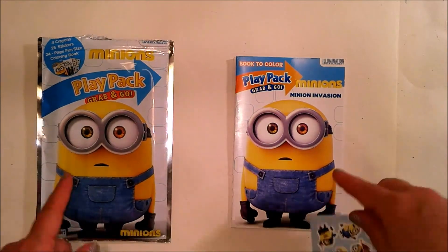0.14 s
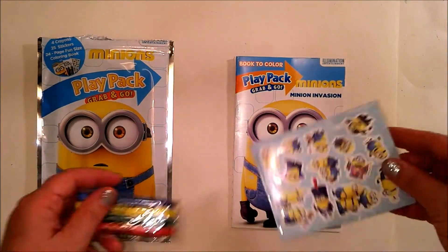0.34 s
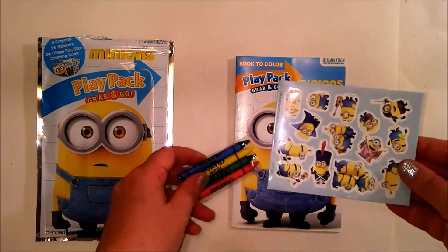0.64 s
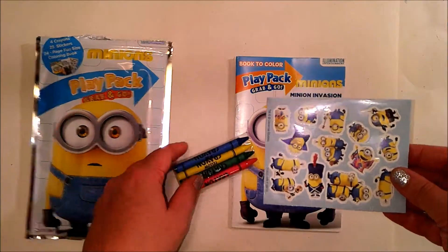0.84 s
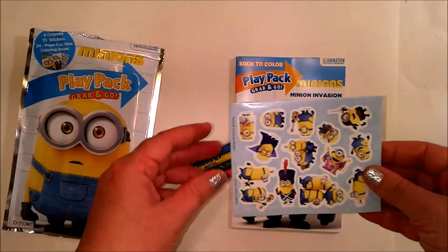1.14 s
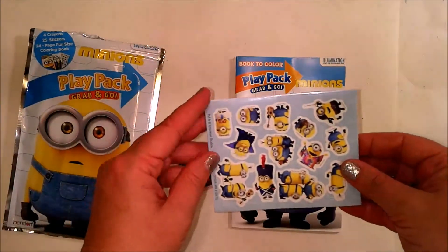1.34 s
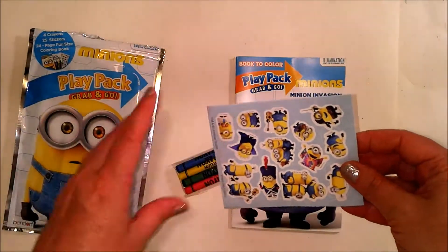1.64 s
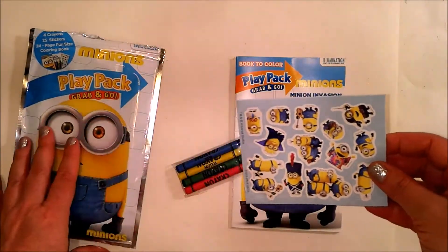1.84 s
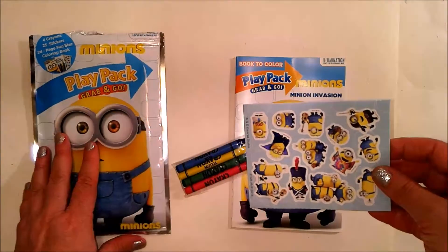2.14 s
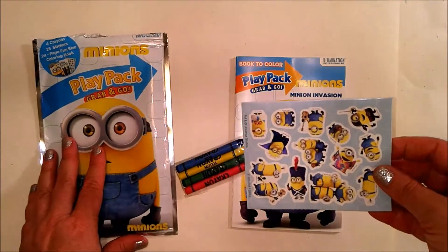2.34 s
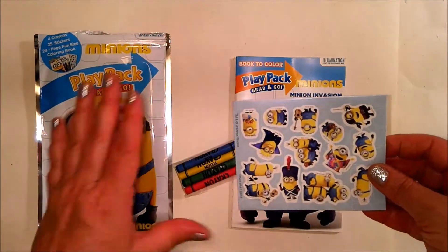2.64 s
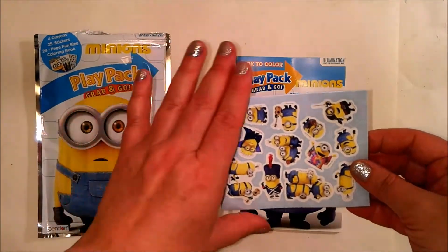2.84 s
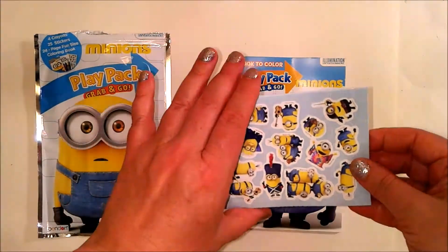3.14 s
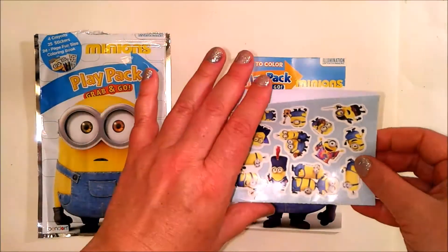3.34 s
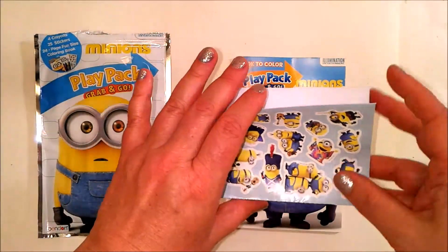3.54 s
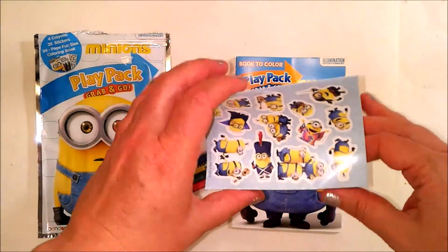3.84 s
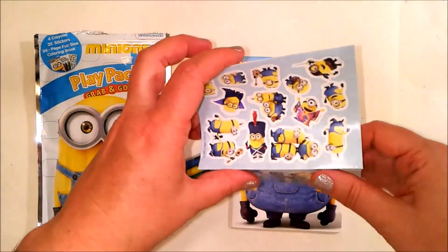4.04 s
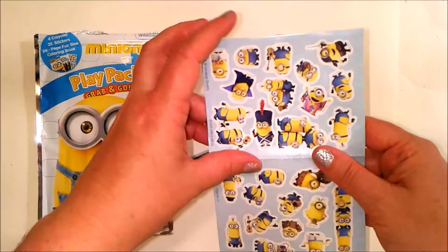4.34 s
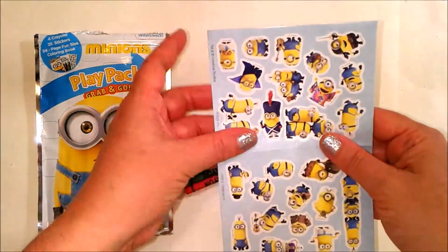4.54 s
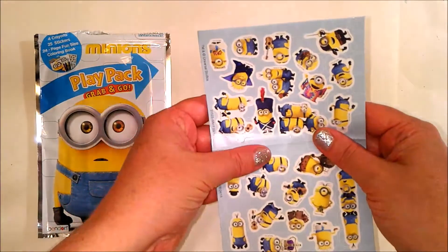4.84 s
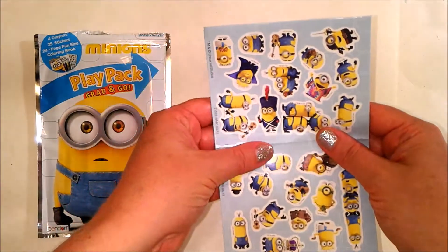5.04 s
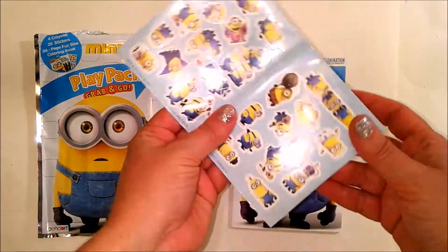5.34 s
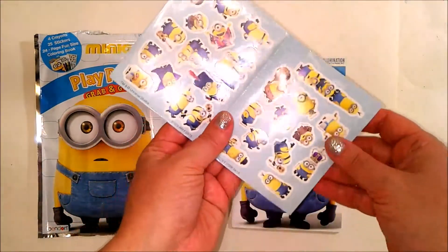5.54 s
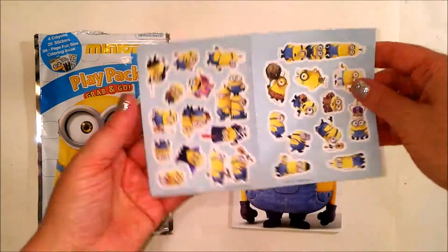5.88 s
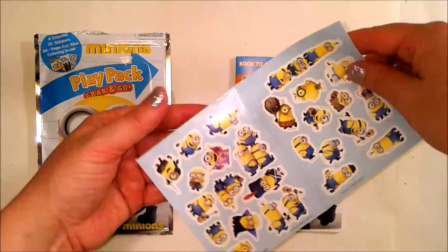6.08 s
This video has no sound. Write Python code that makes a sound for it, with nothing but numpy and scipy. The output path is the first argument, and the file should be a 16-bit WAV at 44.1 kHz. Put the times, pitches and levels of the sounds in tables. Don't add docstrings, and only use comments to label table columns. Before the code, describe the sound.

Thin paper snaps and scrapes under fingers, followed by a dull wooden knock and hard little crayon ticks. Isolated nail and table taps come next, with soft brushing between. Later the sheet slides, opens with a muted knock, crackles in a quick cluster and swishes brightly. A close microphone catches it dry, with short room reverberation, steady hiss, low rumble and a faint distant fan.

```python
import sys
import numpy as np
from scipy import signal
from scipy.fft import rfft, irfft, next_fast_len
from scipy.io import wavfile
from scipy.ndimage import uniform_filter1d

SR = 44100
rng = np.random.default_rng(int(sys.argv[2]) if len(sys.argv) > 2 else 0)


def persist_wave(psi):
    counts = np.round(np.clip(psi, -1, 1) * 32767).astype(np.int16)
    wavfile.write(sys.argv[1], SR, np.atleast_2d(counts).T)


def how_loud(loudness_db):
    steps = np.asarray(loudness_db, float) / 20
    return 10 ** steps


N = 273816


def level(x, db):
    return x * how_loud(db) / np.sqrt(np.mean(x ** 2))


def band(x, hz, width):
    return signal.lfilter(*signal.iirpeak(hz, hz / width, fs=SR), x)


def body(x, modes):
    return sum(how_loud(db) * band(band(x, hz, width), hz, width) for hz, width, db in modes)


def treble(x):
    high_pass = signal.butter(3, 7300, "high", fs=SR, output="sos")
    return signal.sosfilt(high_pass, band(x, 7800, 9100))


def fade(t60, size):
    return np.exp(-np.log(1000) * np.arange(size) / SR / t60)


def add(out, s, sound):
    i = int(s * SR)
    out[i:i + len(sound)] += sound[:N - i]


def glide(breakpoints):
    return np.interp(np.arange(N) / SR, *np.transpose(breakpoints))


def walk(rate):
    k = int(SR / rate)
    steps = np.repeat(rng.standard_normal(N // k + 1), k)
    return 0.62 * uniform_filter1d(uniform_filter1d(steps, k), k)[:N]


def grit(rate, spread_db):
    slips = rng.random(N) < rate / SR
    return slips * rng.standard_normal(N) * how_loud(spread_db * rng.exponential(size=N))


# time in seconds, load in dB.
LEAN = [(0.0, 0), (0.41, -6.5), (0.75, 3), (0.9, 15), (1.06, 11.5), (1.33, 1), (1.68, 0), (1.8, 4),
        (2.0, -8.5), (2.4, 5.5), (2.8, -4), (3.2, 0), (4.86, -2.5), (5.62, 4.5), (6.09, 3), (6.21, 7)]


def rumble():
    lean_db = glide(LEAN)
    low = body(rng.standard_normal(N), [(42.5, 23, -0.5), (58.4, 13.5, -4.5)])
    low = signal.sosfilt(signal.butter(4, [35, 74], "band", fs=SR, output="sos"), low)
    drone = body(rng.standard_normal(N), [(131.3, 68, 3.5), (182.0, 73, -5.5)])
    low_db = -64 + 0.43 * lean_db
    drone_db = -74.5 + lean_db
    return level(low, 2.9) * how_loud(low_db) + level(drone, -0.16) * how_loud(drone_db)


# frequency in Hz, density in dB per Hz.
AIR = [(50, -17), (90, -2), (300, -8.5), (1500, -11), (5300, -19), (6600, -23), (11000, -14.5),
       (16000, -10.5)]


def hiss():
    hz, db = np.transpose(AIR)
    size = next_fast_len(N)
    colour = how_loud(np.interp(np.log(np.fft.rfftfreq(size, 1 / SR) + 1), np.log(hz), db))
    return level(irfft(rfft(rng.standard_normal(size)) * colour, size)[:N], -61.5)


# centre in Hz, width in Hz, level in dB.
WHINE = [(800, 20, -80), (1674, 9.1, -90.5), (2684, 41, -82), (4800, 250, -73)]


def whine():
    out = np.zeros(N)
    for hz, width, db in WHINE:
        tone = body(rng.standard_normal(N), [(hz, width, 0)])
        out += level(tone * how_loud(2 * walk(12)), db)
    return out


# centre in Hz, width in Hz, level in dB.
PAPER = [(2655, 920, -2), (4010, 2600, -3), (5430, 1760, 1.5), (7100, 430, -18)]
# centre in Hz, width in Hz, level in dB.
DULL = [(900, 960, -3), (1570, 890, -2)]
FLECK_RANGE = (1422, 6400)
# time in seconds, level in dB.
FLEX = [(0.0, -66.5), (0.26, -77), (0.55, -71), (0.78, -66), (0.92, -75), (1.5, -79), (3.35, -79.5),
        (3.75, -68.5), (3.98, -76), (4.13, -67.5), (4.41, -64.5), (4.79, -76.5), (5.27, -77), (5.57, -61.5),
        (5.88, -71), (6.09, -73), (6.21, -55.5)]
# start in seconds, length in seconds, rub in dB, dull part in dB.
SCUFFS = [(0, 0.13, -75, 9), (0.413, 0.048, -53.5, -16), (0.699, 0.1, -64.5, 1),
          (0.8165, 0.046, -56.5, -17), (0.903, 0.071, -56.5, -1), (2.32, .035, -60.5, -4),
          (2.372, 0.064, -63.5, -2), (3.867, 0.13, -64, -4.5), (4.097, 0.16, -59.5, -2.5),
          (4.246, 0.11, -59.5, 0), (5.857, 0.061, -54.5, -5.5), (5.92, 0.086, -59.5, -6.5),
          (6.027, 0.11, -61.5, -5)]
# start in seconds, length in seconds, rub in dB, dull part in dB.
SWEEPS = [(0.279, 0.02, -69, 7.5), (0.848, 0.048, -51.5, -2), (1.85, 0.1, -60, -6),
          (1.925, 0.34, -60.5, -32), (3.146, 0.049, -64, -8), (3.233, 0.026, -63.5, -17),
          (3.36, 0.3, -65, -2.5), (3.743, 0.14, -57, -3.5), (3.988, 0.12, -58.5, -7.5),
          (4.343, 0.26, -68, -6), (4.57, 0.058, -57.5, -11), (4.689, 0.082, -66.5, -0.5),
          (4.787, 0.055, -64, -3), (5.141, 0.11, -61.5, -0.5), (5.37, 0.4, -70.5, 8.5),
          (5.538, 0.15, -63, -9), (5.684, 0.11, -69, -2), (5.768, 0.087, -57, -6),
          (6.143, 0.082, -59.5, -2.5)]
# start in seconds, end in seconds.
RAISED = [
    (4.2, 4.5),
    (5.1, 6.3),
]
SCUFF_RISE, SWEEP_RISE = 0.05, 0.34
TOP_DB, RAISED_TOP_DB = -6, -2.5


def rustle():
    sheet = level(sum(body(grit(7000, 0.84) * how_loud(6.4 * walk(40)), [mode]) for mode in PAPER), 0)
    flecks = np.zeros(N)
    for hz in rng.uniform(*FLECK_RANGE, size=12):
        flecks += band(rng.standard_normal(N), hz, 170) * how_loud(23 * walk(35))
    sheet = level(sheet + level(flecks, -10), 0)
    top = level(treble(grit(10000, 0.78) * how_loud(1.7 * walk(40))), -0.66)
    dull = level(body(grit(4000, 0.86) * how_loud(0.88 * walk(30)), DULL), -2.9)
    bend = body(rng.standard_normal(N), [(331, 167, 0)])
    out = level(bend, -1.4) * how_loud(glide(FLEX))
    strokes = [(*row, SCUFF_RISE) for row in SCUFFS] + [(*row, SWEEP_RISE) for row in SWEEPS]
    for s, length, db, dull_db, rise in strokes:
        raised = any(start < s < end for start, end in RAISED)
        top_db = RAISED_TOP_DB if raised else TOP_DB
        span = slice(int(s * SR), min(int((s + length) * SR), N))
        progress = np.linspace(0, 1, span.stop - span.start)
        swell = np.sqrt(np.interp(progress, [0, rise, 1], [0, 1, 0]))
        rub = sheet[span] + how_loud(top_db) * top[span] + how_loud(dull_db) * dull[span]
        add(out, s, how_loud(db) * swell * rub)
    return out


def ticks(table, snap_db, crackle_db, t60):
    out, size = np.zeros(N), 4096
    for (s, db, hz, high_db), noise in zip(table, rng.standard_normal((len(table), 4, size))):
        ring = body(noise[0] * fade(t60, size), [(hz, 0.91 * hz, 0)])
        high = body(noise[1] * fade(0.7 * t60, size), [(5520, 1070, 0)])
        snap = treble(noise[2] * fade(0.9 * t60, size))
        crackle = (body(noise[3], PAPER) + band(noise[3], hz, hz / 2) / 2) * fade(0.054, size)
        dry_db = 1.49 * (db + 49.5)
        parts = [(0, ring), (high_db, high), (snap_db - dry_db, snap), (crackle_db - 0.21 * dry_db, crackle)]
        tick = sum(how_loud(part_db) * part / np.abs(part).max() for part_db, part in parts)
        add(out, s, how_loud(db + 2.0) * tick)
    return out


# start in seconds, peak in dB, ring in Hz, high ring in dB.
CREASES = [(0.0551, -49.5, 2670, 1), (0.2864, -58, 2180, -6), (0.4186, -43.5, 2460, 14.5),
           (0.527, -66, 5500, -4), (0.6992, -39, 2080, -20), (0.7514, -57, 1540, -8),
           (3.2082, -59, 1710, -12), (3.2427, -68, 2610, 10), (3.3645, -56.5, 1720, 1),
           (3.6531, -52.5, 1690, -20), (4.2921, -51, 2530, -19), (5.3784, -48, 1740, -1),
           (5.4262, -46.5, 1760, -3.5), (5.4673, -52, 1590, -5), (5.51, -49, 1980, -3),
           (5.8583, -62, 1810, 14)]


def creases():
    return ticks(CREASES, snap_db=-11, crackle_db=-8.5, t60=0.007)


def modes(table):
    out, t = np.zeros(N), np.arange(20000) / SR
    for s, db, hz, t60 in table:
        build_up = 1 - np.exp(-hz * t / 0.28)
        add(out, s, how_loud(db) * np.sin(2 * np.pi * hz * t) * build_up * fade(t60, len(t)))
    return out


# start in seconds, peak in dB, frequency in Hz, t60 in seconds.
RINGS = [(.9125, -27, 1180, 0.023), (.4135, -43, 5200, 0.0073), (.419, -44.5, 5690, 0.12),
         (.419, -47, 5910, .1), (.419, -46, 6140, 0.14), (2.3905, -48, 4700, .008),
         (.418, -48, 2260, 0.012), (.418, -46, 1160, 0.01), (.6992, -41, 2050, .014),
         (1.981, -49, 1430, 0.026), (2.3125, -35, 2400, 0.011), (2.3125, -32.5, 2950, 0.013),
         (2.3765, -42, 2130, .008), (4.4478, -36.5, 1630, 0.011), (4.449, -43.5, 990, 0.035),
         (5.714, -46, 1530, 0.0072), (5.426, -49, 630, .02), (2.285, -55, 950, .015)]


def object_rings():
    return modes(RINGS)


# start in seconds, peak in dB.
POPS = [
    (0.4186, -21),
    (0.6992, -38.5),
]


def pops():
    out, size = np.zeros(N), 4096
    for (s, db), noise in zip(POPS, rng.standard_normal((len(POPS), size))):
        snap = treble(noise * (fade(0.004, size) + 0.25 * fade(0.025, size)))
        add(out, s, how_loud(db) * snap / np.abs(snap).max())
    return out


# start in seconds, peak in dB, frequency in Hz, t60 in seconds.
BOOMS = [
    (.9105, -23, 63, 0.24),
    (.914, -33, 165, .12),
    (.914, -36, 118, .2),
    (0.69, -52, 82, .3),
    (1.405, -49, 64, .2),
    (1.47, -45, 64, 0.23),
    (5.43, -39, 46, 0.15),
    (5.51, -43, 45, 0.3),
    (5.59, -44, 48, .3),
]


def table_booms():
    return modes(BOOMS)


# frequency in Hz, level in dB, t60 in seconds.
TABLE = [(141.5, -3.5, 0.32), (208, -6.5, 0.18), (347, 1.5, 0.1), (420, 3, 0.061), (516, -20, 0.13),
         (973, -8, 0.064), (1013, -11, 0.12), (1050, -14, 0.16), (1097, -12, .09), (1290, -2, 0.056),
         (1370, -8, 0.064), (1491, -15, 0.053)]
# centre in Hz, width in Hz, level in dB.
WOOD = [(464, 390, 2.5), (976, 260, 7.5), (1460, 150, 6), (2190, 160, -3), (2800, 1200, -2)]
# start in seconds, peak in dB, thud in Hz, woody crack in dB,
# weight on the table in dB.
KNOCKS = [(0.851, -42, 665, 0, -16), (0.91, -41, 1100, 10, -27), (0.9132, -29.5, 1270, 2, -13),
          (.918, -25.5, 405, -17, -5.5), (1.87, -47.5, 1460, 2.5, -15), (1.978, -51.5, 1450, -3.5, -7),
          (2.274, -49.5, 900, -10, -34), (2.285, -52, 910, -6, -25), (2.312, -45.5, 1210, -4, -26),
          (3.212, -42, 800, -7, -36), (3.824, -51, 438, 4, -12), (4.014, -55, 298, 8, -21),
          (4.4499, -30, 570, -18.5, -32.5), (5.715, -35, 634, -29, -28)]


def knocks():
    out, t = np.zeros(N), np.arange(12000) / SR
    size = len(t)
    hz, mode_db, mode_t60 = np.transpose(TABLE)[:, :, None]
    damping = np.exp(-np.log(1000) * t / mode_t60)
    ring = np.sum(how_loud(mode_db) * np.sin(2 * np.pi * hz * t) * damping, axis=0)
    for (s, db, thud_hz, wood_db, ring_db), noise in zip(KNOCKS, rng.standard_normal((len(KNOCKS), size))):
        turns = thud_hz * t / 0.37
        thud = np.sin(2 * np.pi * thud_hz * t) * turns * np.exp(1 - turns)
        tail_db = -21 + 0.77 * ring_db
        decay = how_loud(wood_db) * fade(0.047, size) + how_loud(tail_db) * fade(0.36, size)
        wood = level(body(noise, WOOD), -6.5) * decay
        add(out, s, how_loud(db) * (thud + wood + how_loud(ring_db) * ring))
    return out


# start in seconds, peak in dB, ring in Hz, high ring in dB.
TAPS = [
    (0.8544, -40, 2190, -15),
    (0.8738, -42.5, 3370, -11),
    (0.913, -28.5, 1430, -10.5),
    (0.9794, -50, 1740, -8),
    (1.852, -53, 3630, -5),
    (1.869, -39, 2770, -1),
    (1.9813, -39.5, 2340, -6.5),
    (2.313, -36, 3160, 0.5),
    (2.377, -43, 3640, -2),
    (2.3904, -60, 3160, -6),
]


def taps():
    return ticks(TAPS, snap_db=-21, crackle_db=-17, t60=0.013)


def room(x):
    size, t60 = 16000, 0.21
    noise = rng.standard_normal(size)
    dull = band(noise, 550, 2800)
    tail = dull * fade(t60, size) + 0.66 * (noise - dull) * fade(1.23 * t60, size)
    tail = np.r_[np.zeros(200), tail / np.sqrt(np.sum(tail ** 2))]
    return x + how_loud(-8.5) * signal.fftconvolve(x, tail)[:N]


def scene():
    hands = room(rustle() + creases() + object_rings() + pops() + knocks() + taps())
    hands = hands - 0.18 * band(hands, 7500, 2200)
    return (hands + rumble() + table_booms() + hiss() + whine())[None]


# low edge in Hz, high edge in Hz.
KEPT = [(0, 940), (2550, 2850), (4650, 5050)]
THIN_BRIEF = [.206, .506, 1.083, 1.187, 2.49, 2.598, 3.196, 3.619, 3.706, 3.857, 4.194, 4.388, 4.56, 4.775,
              5.303, 5.692]
THIN_LONG = [.366, 4.505, 5.038]


def thin_out(x):
    out, hz = x.copy(), np.fft.rfftfreq(4096, 1 / SR)
    strong = sum((hz >= low) & (hz < high) for low, high in KEPT) > 0
    moments = [(s, -17, 0.005) for s in THIN_BRIEF] + [(s, -38, 0.011) for s in THIN_LONG]
    for (s, db, width), luck in zip(moments, rng.random((len(moments), 128))):
        start = int(s * SR) - 2048
        weak = ~strong & (luck[(hz / 180).astype(int)] > 0.07)
        dip = np.clip(1.5 - np.abs(np.arange(-2048, 2048) / SR) / width, 0, 1)
        lost = irfft(rfft(out[start:start + 4096]) * weak) * (how_loud(db * dip) - 1)
        add(out, (start + 0.1) / SR, lost)
    return out


def band_limit(x):
    return signal.sosfilt(signal.butter(12, 16780, fs=SR, output="sos"), x)


def record(dry):
    size = next_fast_len(N)
    passed = np.fft.rfftfreq(size, 1 / SR) < 15830
    cut = irfft(rfft(dry[0], size) * passed, size)[:N]
    mix = thin_out(cut)[None]
    return band_limit(mix)


dry = scene()
out = record(dry)
persist_wave(out)
```